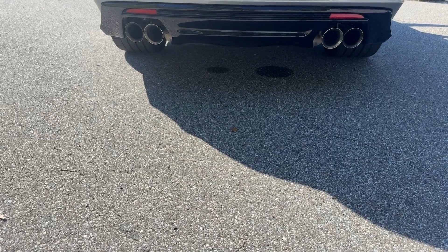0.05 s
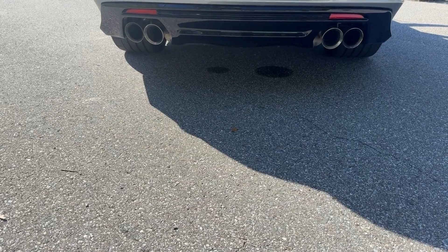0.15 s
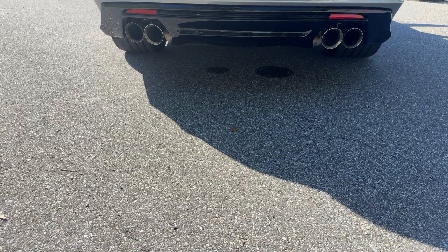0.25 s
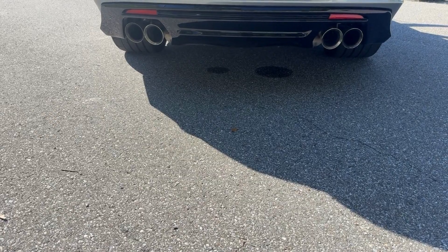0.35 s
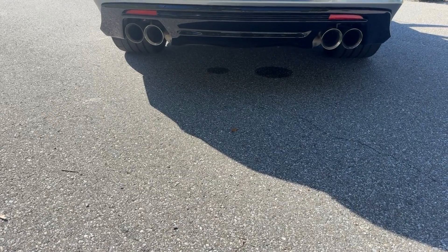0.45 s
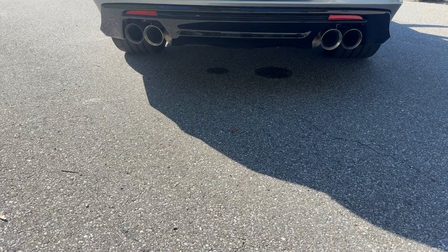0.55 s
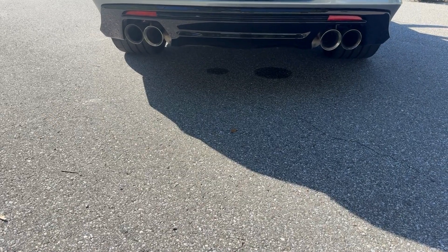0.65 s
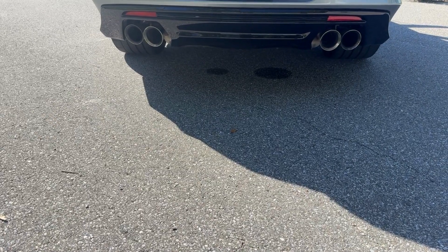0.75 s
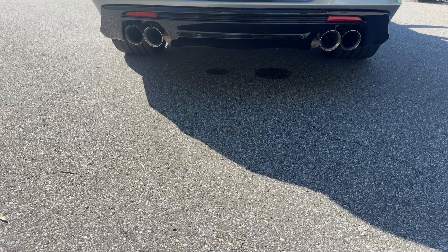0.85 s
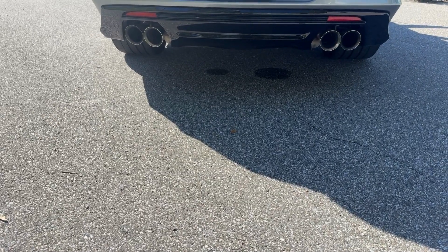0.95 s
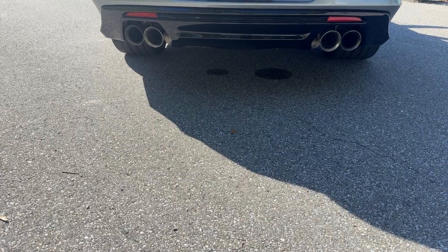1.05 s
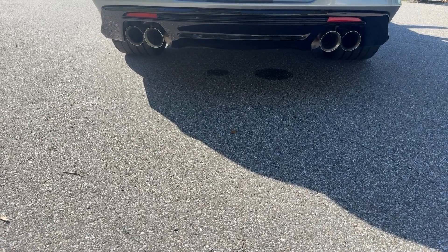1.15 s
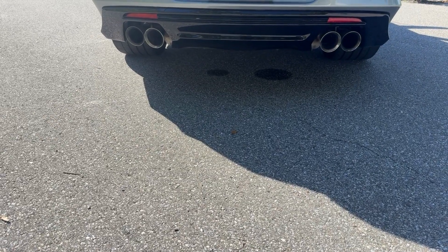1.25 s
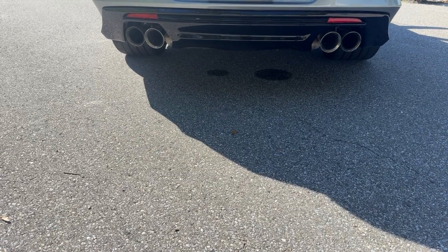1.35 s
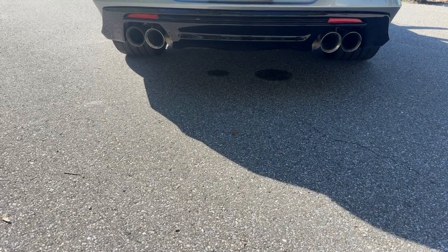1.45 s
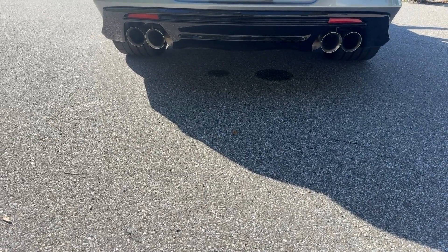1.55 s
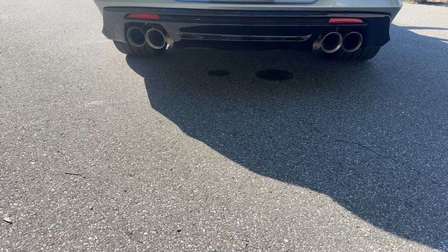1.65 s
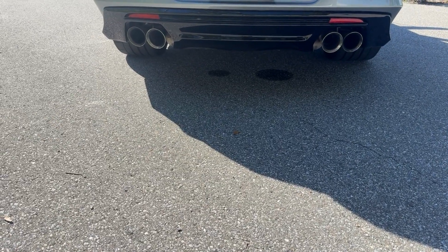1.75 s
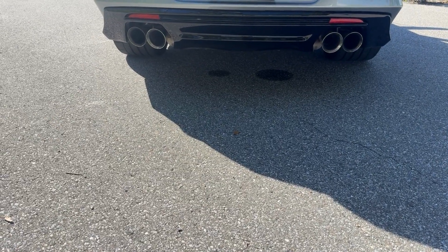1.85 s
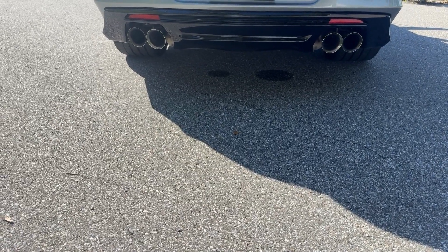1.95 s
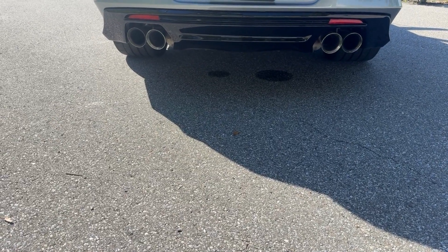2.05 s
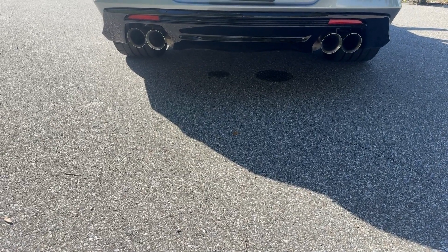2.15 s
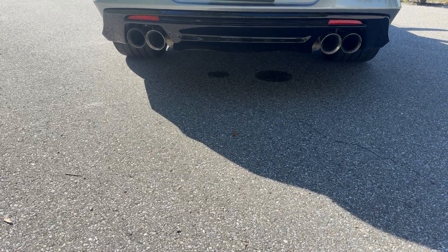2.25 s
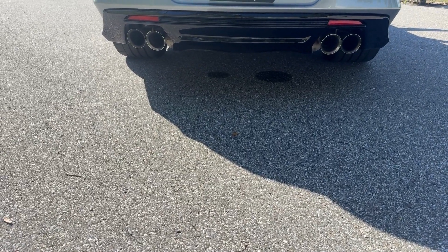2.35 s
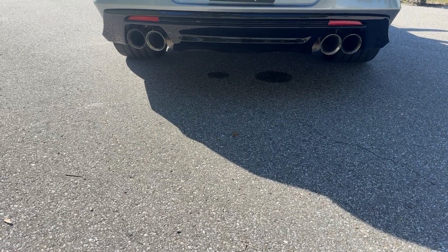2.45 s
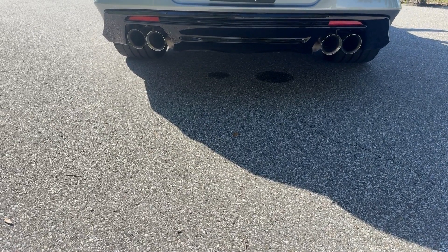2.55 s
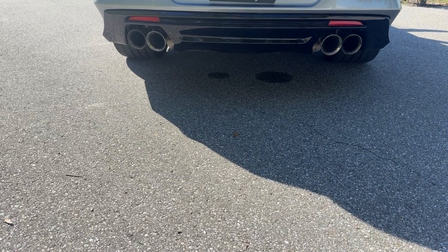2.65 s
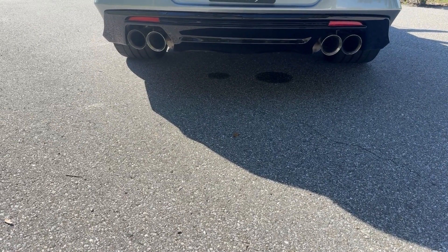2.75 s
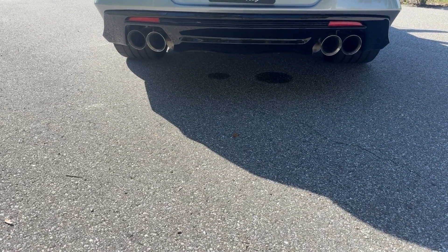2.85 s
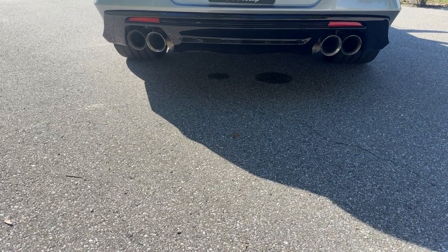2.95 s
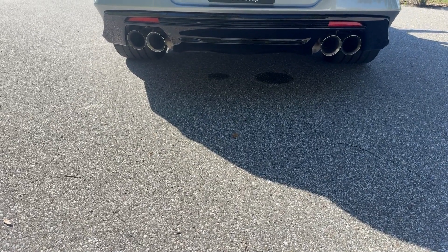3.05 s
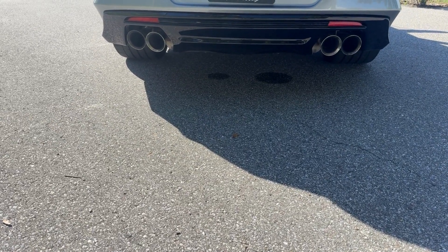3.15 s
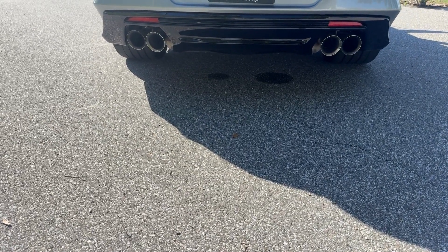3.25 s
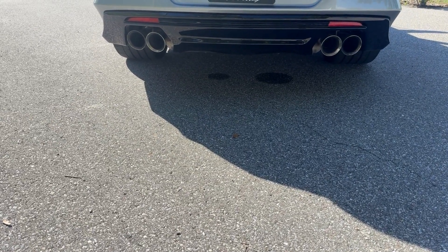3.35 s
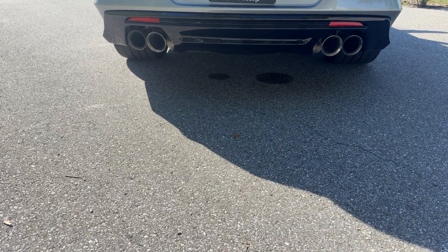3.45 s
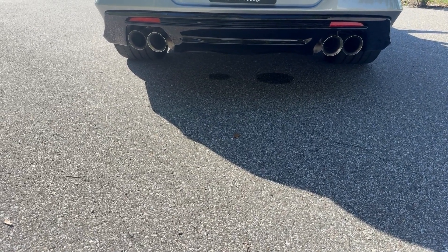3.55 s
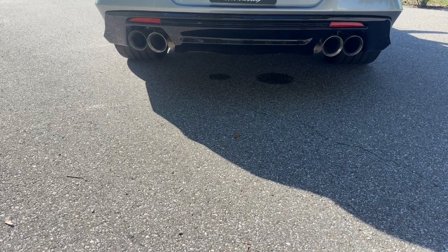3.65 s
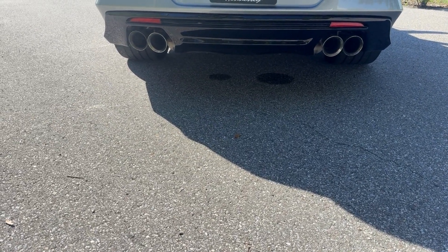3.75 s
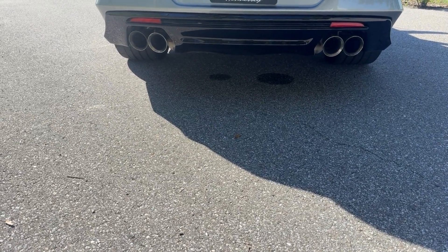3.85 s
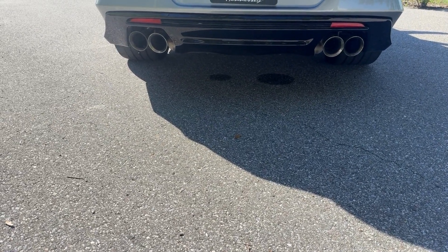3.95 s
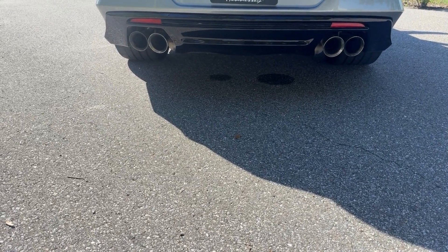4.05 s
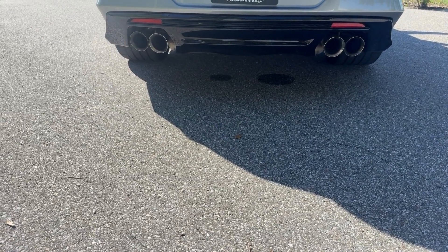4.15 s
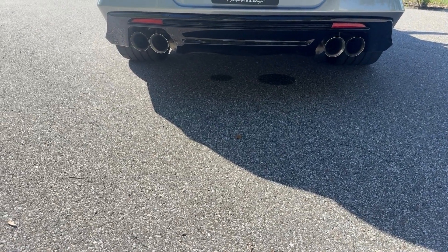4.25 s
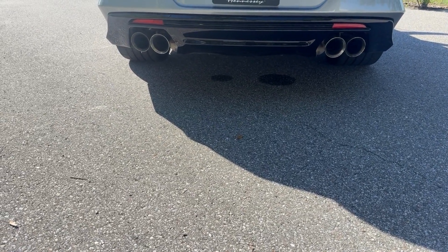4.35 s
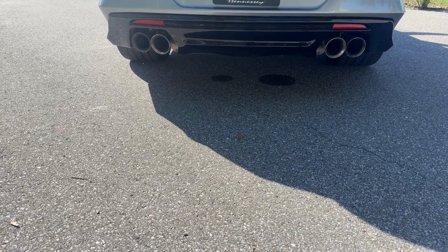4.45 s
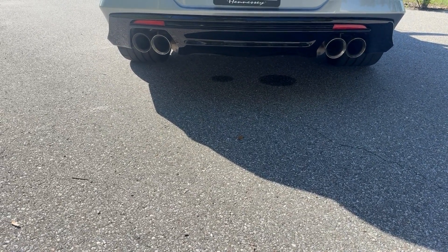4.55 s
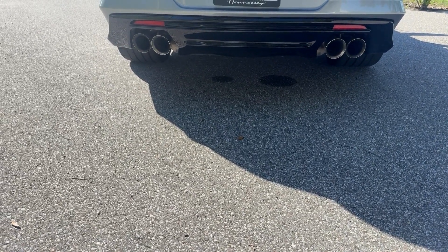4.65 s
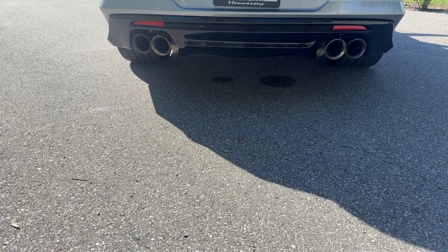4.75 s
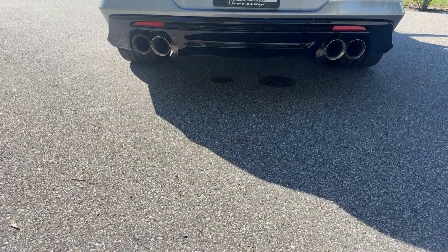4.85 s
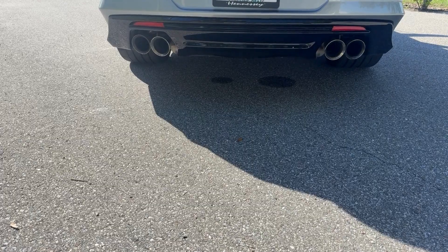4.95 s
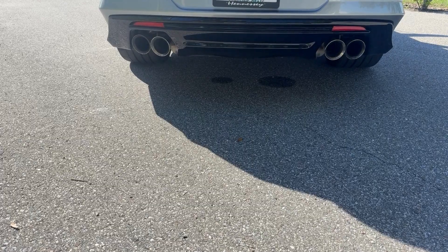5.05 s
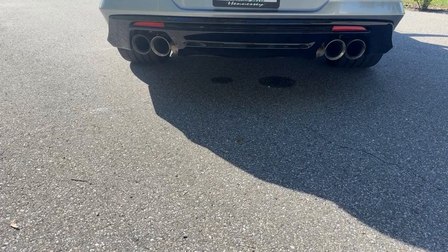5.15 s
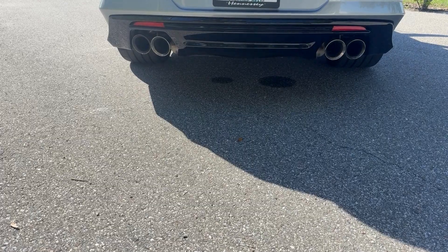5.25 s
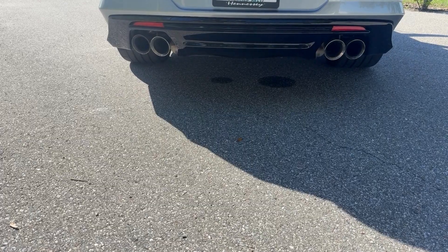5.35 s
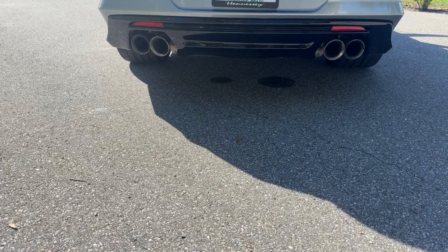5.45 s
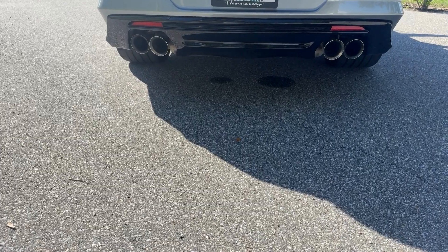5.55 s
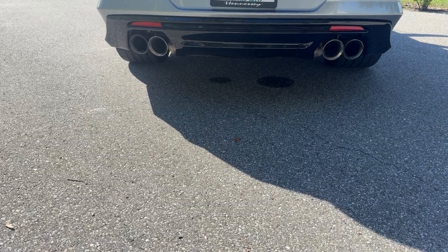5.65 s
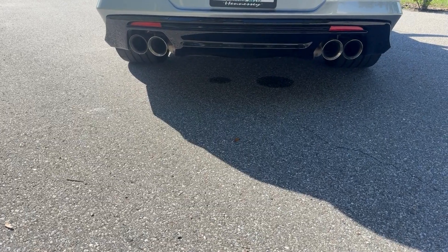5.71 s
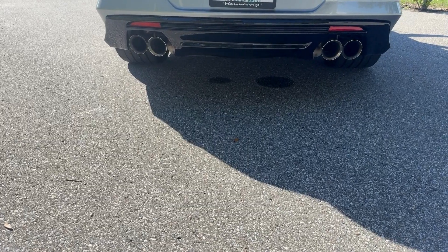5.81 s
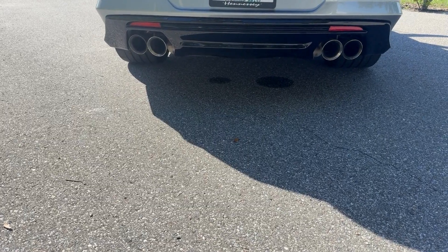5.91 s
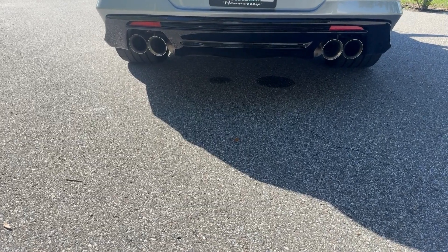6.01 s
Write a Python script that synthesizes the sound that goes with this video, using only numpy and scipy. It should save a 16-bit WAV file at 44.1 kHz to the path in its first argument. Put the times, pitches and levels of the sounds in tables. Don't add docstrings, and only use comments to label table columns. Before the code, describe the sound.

After quiet traffic rumble, a starter clunks and whines, then a big eight-cylinder engine cracks loudly at its tail pipes and settles into lumpy idle.

```python
import sys
import numpy as np
from scipy import signal
from scipy.fft import rfft, irfft
from scipy.io import wavfile
from scipy.ndimage import uniform_filter1d

SR = 44100
rng = np.random.default_rng(int(sys.argv[2]) if len(sys.argv) > 2 else 0)


def master(y):
    cut = np.clip(np.atleast_2d(y).T, -1, 1)
    pcm = np.round(cut * 32767)
    wavfile.write(sys.argv[1], SR, pcm.astype(np.int16))


def magnitude_from_level(level_db):
    exponent = np.asarray(level_db, float) / 20
    return 10 ** exponent


N = 268128
TIME = np.arange(N) / SR

FIRST_FIRING_S = 3.395
TIP_EDGE_HZ = 2330
SIZZLE_HZ = 9100
# f/Hz, width/Hz, level/dB
TIPS = [(1104, 74, 3.5), (1270, 123, 0), (1461, 86, 0.5), (1788, 33, 1), (1970, 73, -1.5), (2110, 44, 1)]
# f/Hz, density/dB per Hz
JET = [(1350, -7), (2300, -8), (3960, -14), (4550, -2), (5220, -12), (8780, -11.5), (9520, -11.5),
       (10600, -9), (14200, -12), (16000, -8.5)]


def rms_one(x):
    return x / np.sqrt(np.mean(x ** 2) + 1e-20)


def coloured(points):
    hz, points = np.maximum(np.arange(N // 2 + 1) * SR / N, 1), np.array(points)
    gain = magnitude_from_level(np.interp(np.log(hz), np.log(points[:, 0]), points[:, 1]))
    return rms_one(irfft(rfft(rng.standard_normal(N)) * gain, N))


def drift(rate_hz):
    r = np.exp(-2 * np.pi * rate_hz / SR)
    return rms_one(signal.lfilter([1], [1, -2 * r, r * r], rng.standard_normal(N + SR))[SR:])


def resonate(x, modes):
    out = 0
    for k, (hz, width_hz, db) in enumerate(modes):
        r = np.exp(-np.pi * width_hz / SR)
        a = [1, -2 * r * np.cos(2 * np.pi * hz / SR), r * r]
        b = np.array([1, 0, -1]) * (1 - r * r) / 2
        out = out + (-1) ** k * magnitude_from_level(db) * signal.lfilter(b, a, x + 1e-18)
    return out


def cut(x, hz, kind, order=2):
    return signal.sosfilt(signal.butter(order, hz, kind, fs=SR, output="sos"), x)


def puff(clicks, rise_s, fall_s):
    for tau_s in (rise_s, fall_s):
        r = np.exp(-1 / (max(tau_s, 1e-4) * SR))
        clicks = signal.lfilter([1 - r], [1, -r], clicks + 1e-18)
    return clicks


def smooth(x, span_s):
    return uniform_filter1d(x, max(int(span_s * SR), 1))


def evened(x, window_s=0.24):
    power = uniform_filter1d(x ** 2, int(window_s * SR), mode="reflect").clip(0)
    return x / np.sqrt(power + 1e-3 * np.mean(x ** 2))


def ramps(starts_s, values, slopes):
    row = np.maximum(np.searchsorted(starts_s, TIME) - 1, 0)
    return values[row] + slopes[row] * np.maximum(TIME - starts_s[row], 0)


def train(at, db, jitter_s):
    clicks = np.zeros(N)
    jitter = (jitter_s * SR * rng.standard_normal(len(at))).astype(int)
    clicks[np.clip(at + jitter, 0, N - 1)] = magnitude_from_level(db)
    return clicks


def traffic():
    # f/Hz, density/dB per Hz
    rumble = [(18, -45), (30, -88), (47, -3.5), (71, -2.5), (97, -8), (222, -20), (337, -31), (794, -28),
              (1030, -32.5), (1520, -38.5), (1690, -39.5), (2430, -43.5), (3980, -57.5), (6360, -58),
              (15000, -73.5)]
    # f/Hz, side minus mid/dB
    side_over_mid = np.array([(60, -27), (110, -7), (200, -7), (380, 4.5), (700, -3), (1290, 9),
                              (2380, -11.5), (4400, -9), (8120, -16), (15000, 9)])
    hz, db = np.transpose(rumble)
    side_db = db + np.interp(np.log(hz), np.log(side_over_mid[:, 0]), side_over_mid[:, 1])
    mid = coloured(rumble) * magnitude_from_level(.7 * drift(3.))
    side = magnitude_from_level(-17.0) * coloured(np.transpose([hz, side_db]))
    return magnitude_from_level(-35.5) * (mid + side * [[1], [-1]])


def lot(x):
    out, dull = np.array([x, x]), cut(x, [200., 2200.], "band", order=1)
    echoes = [(.0031, -23), (.0043, -70), (.021, -28.5), (.027, -24.5), (.063, -51), (.081, -49)]
    for k, (lag_s, db) in enumerate(echoes):
        lag = int(lag_s * SR)
        out[k % 2, lag:] += magnitude_from_level(db) * dull[:-lag]
    return out


def clunk():
    # f/Hz, level/dB, t60/s
    bell_housing = [(371., -2., .06), (700., -4., .02), (1230., -9., .02), (2050., -6., .02),
                    (2700., -1., .03), (3350., -8., .02), (6160., -12., .015)]
    # f/Hz, width/Hz, level/dB
    seat_modes = [(188, 46, -1.5), (360, 38, 4), (475, 130, -0.5)]
    strike_s, seat_s = 2.386, 2.41
    rattle = puff(train(np.array([int(strike_s * SR)]), 59.4, 0), 0.00074, 0.03) * rng.standard_normal(N)
    modes = [(hz, np.log(1000) / np.pi / t60_s, db) for hz, db, t60_s in bell_housing]
    wide = .12 * cut(rattle, [300., 4000.], "band", order=1)
    seat = puff(train(np.array([int(seat_s * SR)]), 54.5, 0), 0.0023, .03) * rng.standard_normal(N)
    return magnitude_from_level(-5.) * (resonate(rattle, modes) + wide) + resonate(seat, seat_modes)


def gear_whine():
    # t/s, length/s, mesh f/Hz, glide/Hz per s, level/dB
    glides = [
        (2.462, .19, 725, 1348.5, -43),
        (2.64, 0.12, 960, -2700, -42.5),
        (2.861, .11, 1120, -2600, -43),
        (3.024, 0.094, 1250, -2300, -44.5),
        (3.185, 0.062, 678, -500, -39.5),
        (3.31, 0.06, 658, -100, -39.5),
    ]
    # multiple of the mesh, level/dB
    gears = [(1., 0.), (1.55, -10.), (2.12, -2.), (2.65, -12.), (3.2, -11.), (3.7, -13.), (4.25, -13.),
             (5.1, -13.), (6., -14.), (6.7, -17.)]
    fade_s, inertia_s = 0.053, 0.055
    s, length_s, mesh_hz, glide, level_db = np.transpose(glides)
    sounding = (ramps(s, length_s, 0 * s - 1) > 0) * (TIME > s[0])
    singing = smooth(magnitude_from_level(ramps(s, level_db, 0 * s)) * sounding, fade_s)
    speed_hz = smooth(ramps(s, mesh_hz, glide), inertia_s) * (1 + .012 * drift(50.))
    angle = 2 * np.pi * np.cumsum(speed_hz) / SR
    return singing * sum(magnitude_from_level(db + 4 * drift(25.)) * np.sin(times * angle) for times, db in gears)


def grind_and_brushes():
    # t/s, grind level/dB, fall/dB per s
    surges = [
        (2.381, -33.5, 94),
        (2.48, -39, -2),
        (2.6, -37.5, 15),
        (2.849, -36.5, -1),
        (2.94, -34.5, 118),
        (3.031, -32.5, 76),
        (3.184, -29, 177),
        (3.29, -29.5, 160),
        (3.384, -22, 50),
    ]
    # f/Hz, density/dB per Hz
    teeth = [(88, -36), (150, 3), (373, -7.5), (413, 1.5), (660, -3.5), (732, -12), (776, -4),
             (1930, -10.5), (2070, -10.5), (5000, -17), (6500, -51), (11000, -120)]
    # f/Hz, width/Hz, level/dB
    casing = [(660., 60, 1), (1354, 155, 8.5), (2060, 60, 1), (2433, 110, 9), (3050., 90, 2.5),
              (3407, 90, 8), (4190, 57, -22), (4530, 81, -10.)]
    # f/Hz, density/dB per Hz
    brushes = [(2350, -31), (4000, -16), (4390, -16), (6110, 4), (6630, -2), (8260, -0.5), (9220, -3.5),
               (9550, -7), (10600, -1), (15100, -9), (16000, -9)]
    off_s, rise_s = 3.42, 0.024
    surge_s, surge_db, fall = np.transpose(surges)
    grind_db = smooth(ramps(surge_s, surge_db, -fall), rise_s)
    brush_db = -49 + 1.36 * (grind_db + 38)
    engaged = smooth(1. * (TIME > surge_s[0]) * (TIME < off_s), rise_s)
    grind = coloured(teeth)
    grind = (grind + rms_one(resonate(grind, casing))) * magnitude_from_level(1.5 * drift(60.))
    return engaged * (magnitude_from_level(grind_db - 3.0) * grind + magnitude_from_level(brush_db) * coloured(brushes))


def starter():
    return gear_whine() + grind_and_brushes() + clunk()


def firings():
    # t/s, firing rate/Hz
    speed = [(3.39, 43.24), (3.44, 49.38), (3.49, 78.34), (3.55, 94.87), (3.62, 104.29), (3.7, 106.1),
             (4.0, 105.2), (4.15, 103.4), (4.45, 90.9), (4.6, 85.8), (4.9, 78.4), (5.1, 76.0), (5.5, 73.8),
             (5.9, 75.15), (6.08, 74.47)]
    # t/s, firings in the run, level/dB
    uneven = [(3.586, 2, -25), (3.616, 2, 5.5), (3.635, 1, -19), (3.682, 2, -18), (3.701, 1, 15),
              (3.72, 2, -5), (3.748, 1, 10.5), (3.777, 1, 13), (3.928, 1, -6), (4.071, 1, 6.5),
              (4.148, 1, -14), (4.187, 1, -18), (4.227, 1, -18), (4.328, 2, -8.5), (4.392, 1, -10),
              (4.424, 1, -12), (4.581, 1, 8.5), (4.723, 1, -14), (4.784, 1, 6.5), (4.872, 2, -12),
              (4.987, 1, 2.5), (5.013, 1, -10), (5.143, 1, -11), (5.197, 1, -11), (5.304, 1, -10),
              (5.397, 1, -21), (5.613, 1, -24), (5.827, 1, -12), (6.001, 1, 4), (6.041, 1, -24)]
    cylinder_db = [0.2, -1, 0.8, -1.7, -0.2, 1, -7, 1]
    turn = np.cumsum(np.interp(TIME, *np.transpose(speed)) * (TIME >= FIRST_FIRING_S)) / SR
    at = np.searchsorted(turn, np.arange(int(turn[-1]) + 1) + 1e-9)
    db = np.resize(cylinder_db, len(at)) + 1.5 * rng.standard_normal(len(at))
    for s, run, odd_db in uneven:
        first = np.argmin(abs(at - s * SR))
        db[first:first + round(run)] = odd_db
    return turn, at, db


def voice(lost_db, idle_db, effort_share, catch_db=0, lost_share=0):
    # t/s, level over the settled idle/dB
    effort = [(3.385, -7), (3.4, 11.5), (3.5, 11), (3.66, 11), (3.71, 2.5), (3.87, 6.5), (3.92, 0),
              (4.0, 8.5), (4.05, 2.5), (4.14, 6), (4.21, 2), (4.24, 6), (4.34, -1), (4.38, 2.5),
              (4.52, -0.5), (4.58, 3), (4.7, -0.12), (6.08, -0.26)]
    effort_db = np.interp(TIME, *np.transpose(effort), left=-150)
    catch = np.exp(-np.maximum(TIME - FIRST_FIRING_S, 0) / 0.083)
    return magnitude_from_level(idle_db + effort_share * effort_db + catch_db * catch + lost_share * lost_db)


def floor_boom(at, db):
    boom = cut(cut(train(at, 0.71 * db, 0.008), [40., 70.], "band"), 53.0, "low")
    boom_db = np.maximum(-11.5 - 38 * (TIME - FIRST_FIRING_S), -42)
    return magnitude_from_level(boom_db) * evened(boom, window_s=0.98)


def cold_pound(at):
    # f/Hz, width/Hz, level/dB
    cold_pipe = [(75, 54, .1), (150, 90, -.1)]
    lag_s, start_db, fade_db_per_s = .009, 38.5, 202
    pound_db = start_db - fade_db_per_s * (at / SR - FIRST_FIRING_S)
    return cut(resonate(train(at + int(lag_s * SR), pound_db, 0), cold_pipe), 196.0, "low")


def thump(turn, db):
    # f/Hz, width/Hz, level/dB
    pipe = [(88., 45., 0.), (210., 125., -.5), (240., 100., -16.)]
    present = np.minimum(np.round(turn).astype(int), len(db) - 1)
    strength = magnitude_from_level(db)[present]
    turn = turn + .035 * rng.standard_normal(len(db))[present]
    leads = [0, np.pi / 4, np.pi / 2]
    orders = 0
    for k, mode in enumerate(pipe):
        wave = np.cos(2 * np.pi * (k + 1) * turn + leads[k])
        orders = orders + resonate(strength * wave, [mode])
    flow = resonate(rng.standard_normal(N), pipe[:2])
    return evened(orders, window_s=.2) + magnitude_from_level(-10.) * rms_one(flow)


def rasp(bark_gate, hiss_gate, lost_db):
    # f/Hz, width/Hz, level/dB
    silencer = [(294, 240, -6), (381, 47, 2.5), (455.5, 25, 2.5), (564, 69, 1.5), (723, 140, -7)]
    # f/Hz, width/Hz, level/dB
    tip_rim = [(2810, 150, -19)]
    # f/Hz, width/Hz, level/dB
    rim_modes = [(2710, 320, .1), (3190, 360, -.1)]
    growl = evened(resonate((bark_gate + 0.32) * (rng.standard_normal(N) + 0.75), silencer))
    front = np.diff(bark_gate, prepend=0).clip(0)
    gas = bark_gate * rng.standard_normal(N) + 13.0 * front
    bark = evened(cut(resonate(gas, TIPS), TIP_EDGE_HZ, "low", order=6) + resonate(gas, tip_rim))
    rim = evened(resonate(resonate(gas, rim_modes), rim_modes))
    hiss = evened(hiss_gate * coloured(JET))
    sizzle = cut(hiss, SIZZLE_HZ, "high")
    body = voice(lost_db, -36.5, 1.8153, catch_db=-11.5, lost_share=0.04) * growl
    body = body + voice(lost_db, -39.5, 1.2654, catch_db=4, lost_share=0.24) * bark
    body = body + voice(lost_db, -57, 2, catch_db=-8, lost_share=-0.5) * rim
    jet = voice(lost_db, -46, 2.09, catch_db=-3, lost_share=0.37) * hiss
    jet = jet + voice(lost_db, -47, 0.36, catch_db=20, lost_share=-0.5) * sizzle
    return body, jet


def cracks(firing_s):
    # t/s, peak level/dB, hiss over bark/dB
    late = [(3.6161, -13.5, 2), (3.653, -13.5, 5.5), (3.699, -15, 4), (3.736, -20, -14), (3.7665, -15, -19),
            (3.8125, -16, -30), (3.832, -15, -7), (3.8527, -9.5, -6.5), (3.8786, -12, -22),
            (3.938, -14, -16), (4.0033, -3.5, -35), (4.0794, -11, -26), (4.1079, -13, -18),
            (4.1566, -14, -19), (4.194, -20.5, -25), (4.2345, -15, -31), (4.568, -14, -28),
            (4.6746, -25, -15), (4.7194, -31, -21), (4.7708, -17, -16), (4.808, -23, -30),
            (4.882, -24.5, -11), (4.9604, -20.5, -24), (5.0776, -25, -23), (5.1954, -26, -18),
            (5.306, -27, -6), (5.3304, -16.5, -21), (5.827, -24, -29), (6.0408, -21, -32)]
    flare_s = firing_s[firing_s < 3.59]
    since_s = flare_s - FIRST_FIRING_S
    flare_db = -2.5 - 40 * since_s + 4.5 * rng.standard_normal(len(since_s))
    bright_db = np.minimum(-35 + 328 * since_s, -2)
    s, db, hiss_db = np.hstack([[flare_s, flare_db, bright_db], np.transpose(late)])
    at = (s * SR).astype(int)
    front = train(at, db, 0)
    burst = puff(front, .0001, .002) * rng.standard_normal(N) + .08 * front
    damped = [(hz, 1.9 * width_hz, -2.) for hz, width_hz, _ in TIPS[::2]]
    crack = cut(resonate(burst, damped), TIP_EDGE_HZ + 200, "low")
    return magnitude_from_level(48.) * crack, magnitude_from_level(38.) * puff(train(at, db + hiss_db, 0), .0001, .0015)


def exhaust():
    jet_turn_db = [2.5, -2, -2.5, 2]
    missed_below_db, linger_s = -8, 0.0035
    bark_lead_s, hiss_lag_s = .0019, 0.0012
    pipe_gap_s = .009
    turn, at, db = firings()

    missed_db = np.where(db < missed_below_db, db, 0)
    tip_db = db - missed_db + np.roll(missed_db, -1)
    lost_db = np.interp(TIME - linger_s, at / SR, np.minimum(tip_db, 0))
    rasp_db = .6 * tip_db + 1.8 * rng.standard_normal(len(at))
    jet_db = rasp_db + np.resize(jet_turn_db, len(at))
    bark_clicks = train(at - int(bark_lead_s * SR), rasp_db, .0006)
    bark_gate = evened(puff(bark_clicks, .00015, .0028)) + .18
    hiss_clicks = train(at + int(hiss_lag_s * SR), jet_db, 0.0012)
    hiss_gate = evened(puff(hiss_clicks, 0.00074, 0.0071)) + 0.37

    crack, snap_gate = cracks(at / SR)
    bark, hiss = rasp(bark_gate, hiss_gate, lost_db)
    bark_apart, hiss_apart = rasp(bark_gate, hiss_gate, lost_db)
    low = voice(lost_db, -22, 1.0357, catch_db=2, lost_share=0.5) * thump(turn, db)
    low = low + floor_boom(at, db) + cold_pound(at)
    shared = low + bark + hiss + crack + snap_gate * coloured(JET)

    jet_apart = hiss_apart + snap_gate * coloured(JET)
    apart = voice(0, -35.5, .9) * np.roll(low, int(pipe_gap_s * SR))
    apart = apart + voice(0, -27, 1) * bark_apart + voice(0, -19, .7) * jet_apart
    apart = apart + voice(0, -22, 0.99) * cut(jet_apart, SIZZLE_HZ, "high")
    return shared, apart


def scene():
    shared, apart = exhaust()
    cranking = starter()
    underbody_s = .007
    apart = apart + magnitude_from_level(-18.5) * np.roll(cranking, int(underbody_s * SR))
    return lot(shared + cranking) + apart * [[1], [-1]] + traffic()


def low_pass(x):
    return signal.sosfilt(signal.butter(12, 16650, fs=SR, output="sos"), x)


def record(dry):
    # low f/Hz, high f/Hz
    treble_gaps = [(9280., 9750.), (12480., 12900.)]
    band = cut(dry, 34.0, "high")
    for edges_hz in treble_gaps:
        band = .08 * band + .92 * cut(band, edges_hz, "bandstop")
    rounded = .92 * np.tanh(band / .92)
    top_cut = signal.cheby2(14, 50, 15950, fs=SR, output="sos")
    return low_pass(signal.sosfilt(top_cut, rounded))


dry = scene()
out = record(dry)
master(out)
```